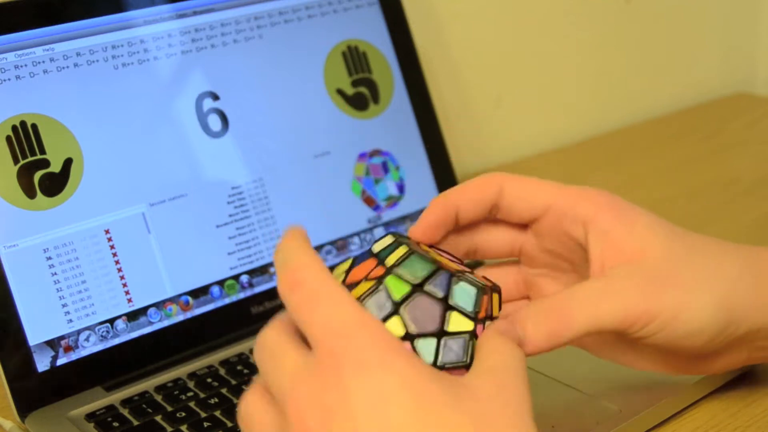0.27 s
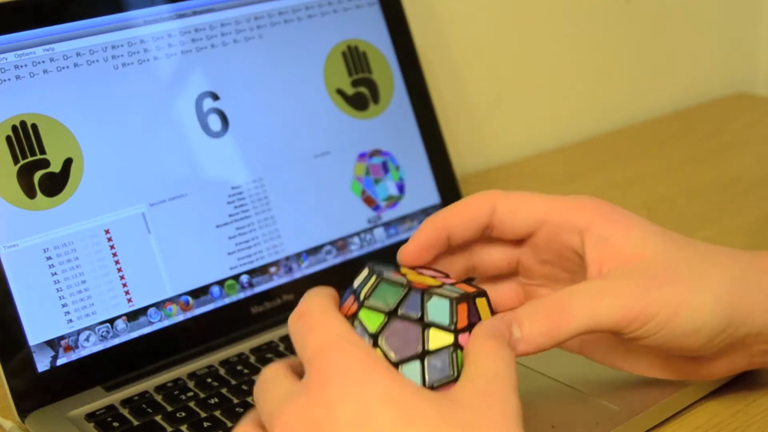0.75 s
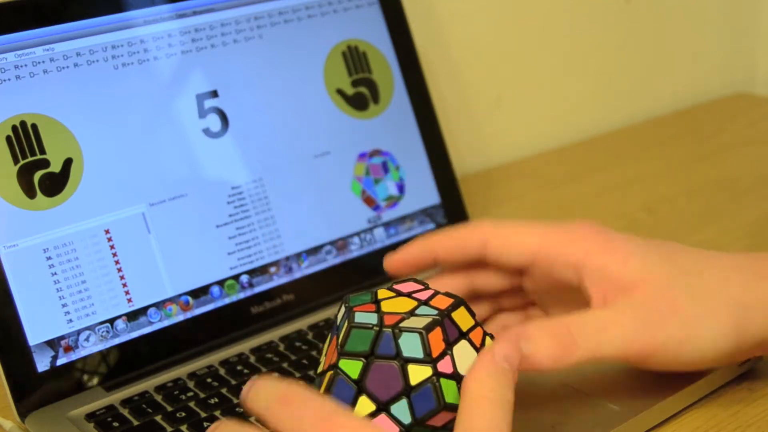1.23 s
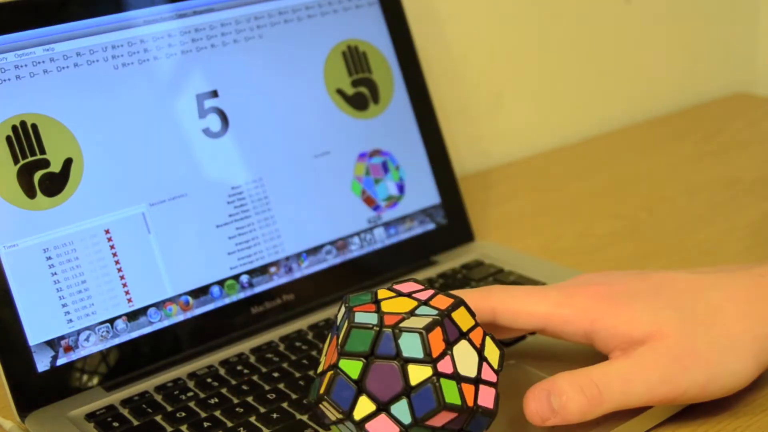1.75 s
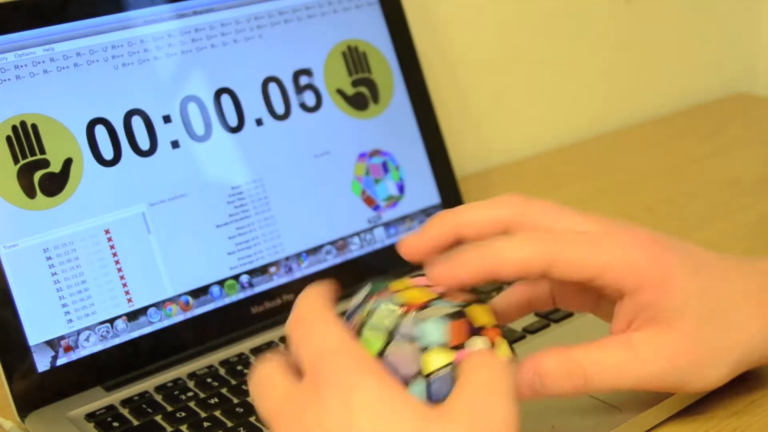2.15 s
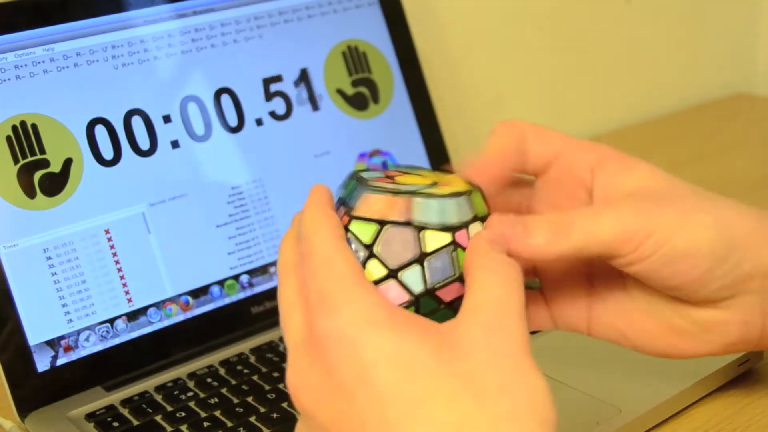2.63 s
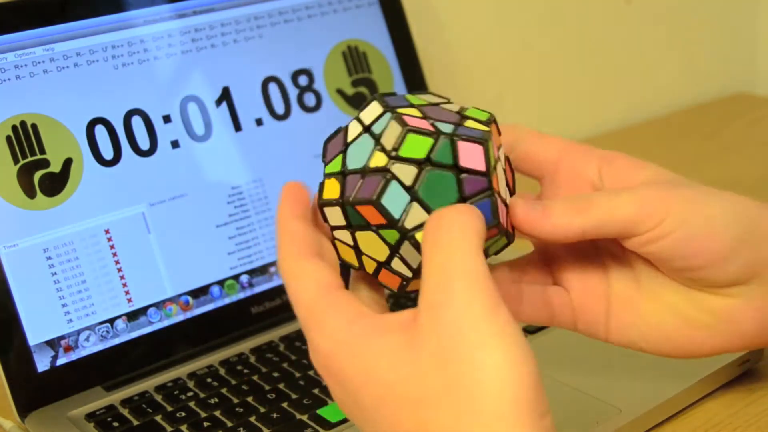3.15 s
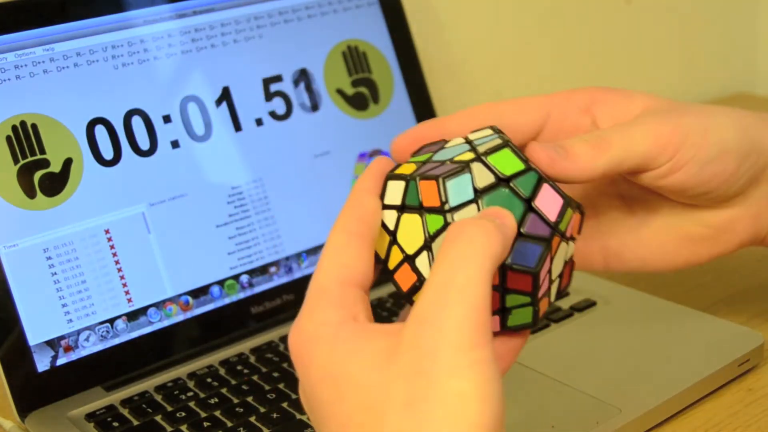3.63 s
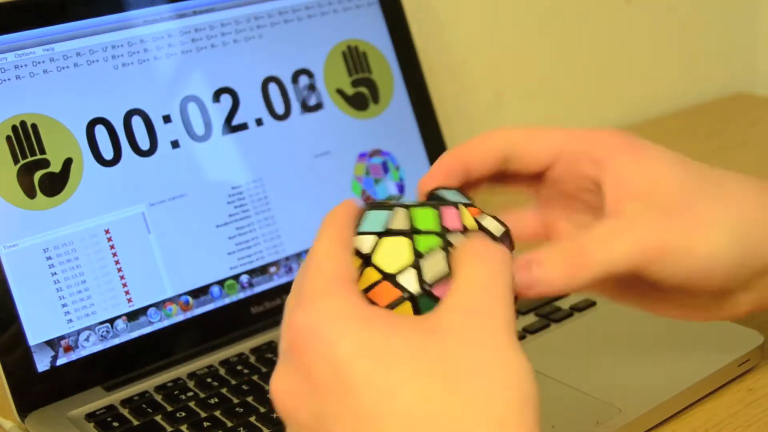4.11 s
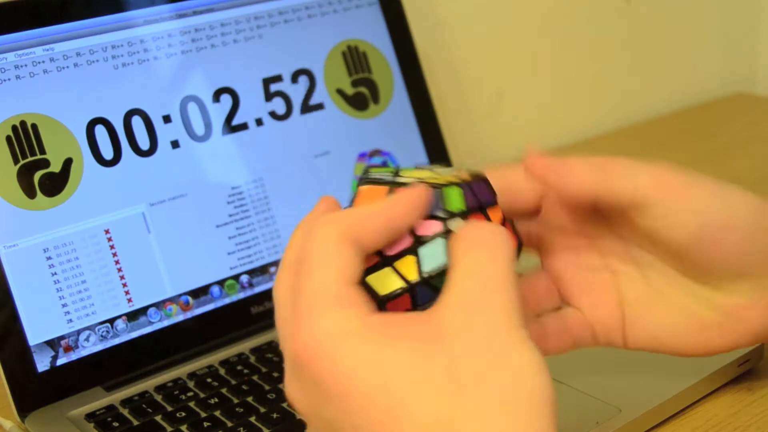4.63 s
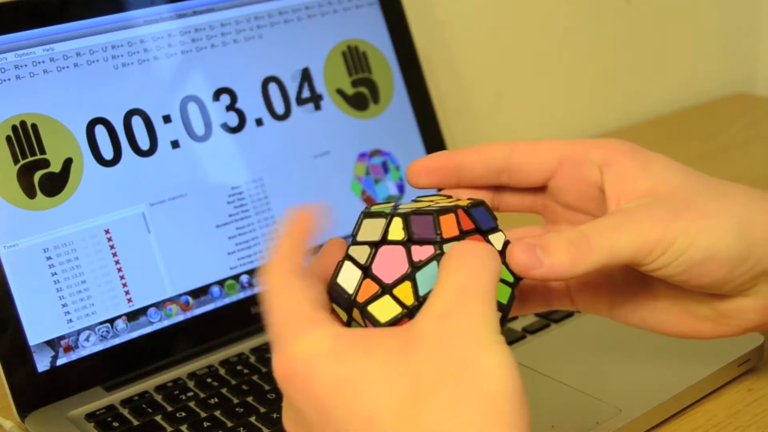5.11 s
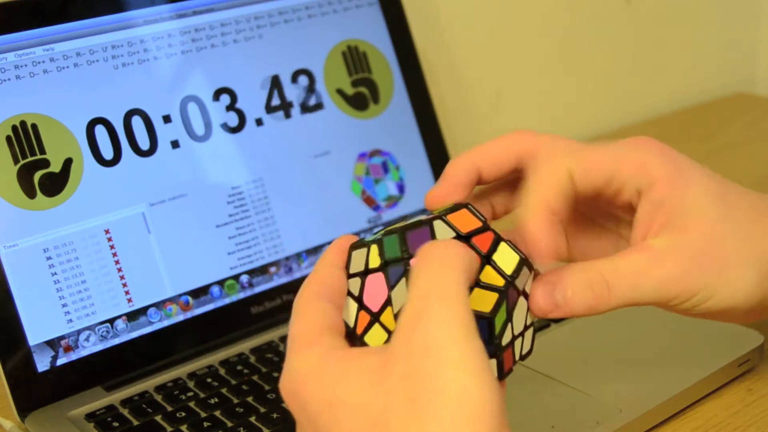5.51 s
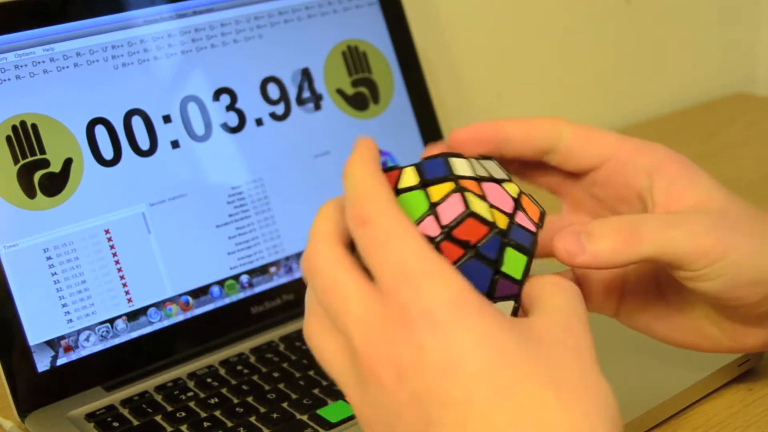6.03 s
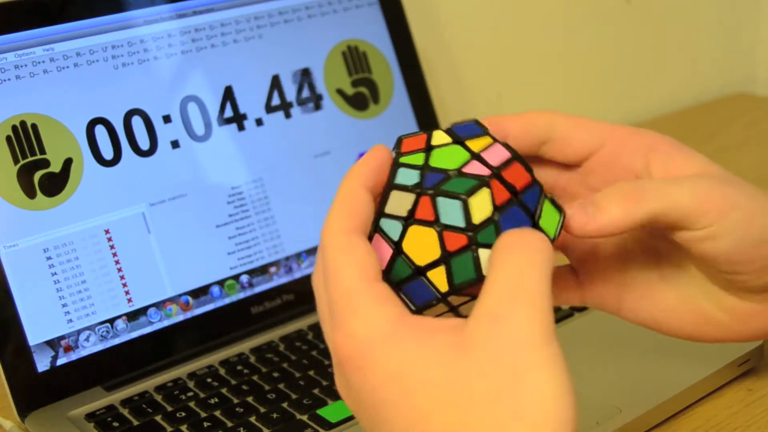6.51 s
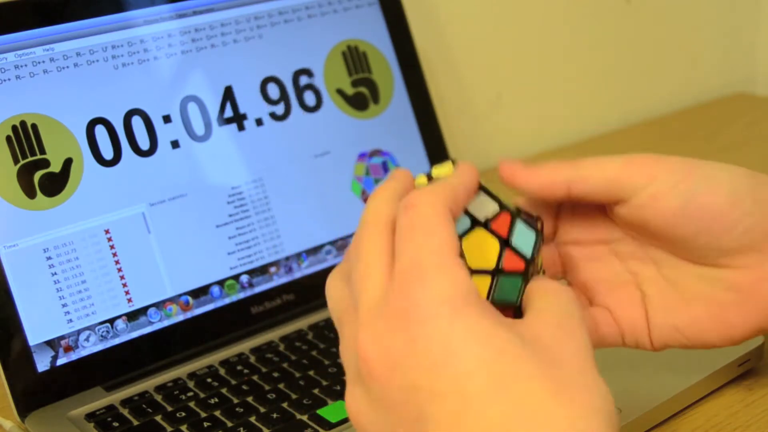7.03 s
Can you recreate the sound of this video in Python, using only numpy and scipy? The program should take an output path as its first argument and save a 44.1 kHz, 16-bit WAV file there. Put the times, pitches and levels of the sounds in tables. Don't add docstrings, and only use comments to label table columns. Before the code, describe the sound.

Close-miked handling indoors: light knocks of plastic on a laptop case, a brief dry skin rub, and a two-part key tap. Quick puzzle turning follows, with sharp clacks, loose ticks, rattles and gritty sliding, densest in the middle, thinning to faint ticks, then returning strongly at the end. Quiet fan noise continues underneath, with a short small-room reverberation.

```python
import sys
import numpy as np
from scipy import signal
from scipy.fft import rfft, irfft
from scipy.io import wavfile
from scipy.ndimage import uniform_filter1d

SR = 44100
rng = np.random.default_rng(int(sys.argv[2]) if len(sys.argv) > 2 else 0)


def convert_level_to_amplitude(level_db):
    exponent = np.asarray(level_db, float) / 20
    return 10 ** exponent


def to_wav(s):
    ch = np.atleast_2d(s).T
    pcm = np.round(np.clip(ch, -1, 1) * 32767)
    wavfile.write(sys.argv[1], SR, pcm.astype(np.int16))


N = 320166

# pitch_hz, level_db (per Hz)
AIR_SPECTRUM = [(25, -25), (50, -12), (100, -5), (200, 0), (400, 0), (630, .5), (1000, -1), (2000, -6),
                (3200, -10.5), (5000, -15), (6300, -19), (8000, -22), (11000, -30)]
AIR_DB = -66.5

# start_s, peak_db, low_db (re peak), bright_db (re peak), desk_thump_db
SET_DOWNS = [(0.4266, -63, 35, -26, -72), (0.716, -59.5, -14, -8, -83), (0.727, -51.5, 4.5, -21, -61.5),
             (0.8398, -35.5, -6, -8, -56), (0.8787, -51.5, -18, -6, -59), (1.0132, -32.5, -11, -22, -54.5),
             (1.0508, -51.5, -20, -33, -64), (1.1837, -57, -1, -10, -70), (1.2151, -59, -1, -8, -85),
             (1.2346, -59, -10, -19, -80), (1.3794, -67, -9, 16, -84), (3.9409, -51.5, 1.5, -11, -88),
             (5.862, -79.5, 2, -20, -62)]
# pitch_hz, width_hz, level_db
CASE_MODES = [(347, 230, -31), (510, 43, -1.5), (790, 430, -3.5), (1180, 1350, -4.5), (1623, 210, 3),
              (1890, 240, -3.5), (2300, 390, -2), (2790, 470, -2), (3110, 520, -2.5), (4800, 2000, -7),
              (6000, 1100, -19), (6100, 450, -21), (10250, 1400, -22)]
# pitch_hz, width_hz, level_db
DESK_MODES = [(105, 24, 0)]
# start_s, peak_db
WRIST_BUMPS = [
    (0.424, -53.5),
    (.735, -50),
    (2.673, -53.5),
    (3.946, -64),
    (5.857, -64),
    (5.903, -64),
]
# pitch_hz, width_hz, level_db
WRIST_MODES = [(171, 92, 1.5), (326, 130, -2), (477, 92, 5.5)]
# start_s, level_db
PALM_DRAG = [
    (1.15, -74),
    (1.176, -83),
    (1.182, -84),
    (1.246, -75),
    (1.252, -68),
    (1.39, -61.5),
    (1.5, -89),
]
# start_s, peak_db, low_db (re peak), bright_db (re peak), desk_thump_db
KEY_BLOWS = [
    (1.942, -53, 7, -11, -76),
    (1.9493, -35.5, -14, -3, -52.5),
    (1.989, -72, -17, 2, -66),
    (2.0224, -42, -11, 0, -51),
    (2.0385, -47, -5.5, -14, -69),
]
# pitch_hz, width_hz, level_db
KEY_MODES = [(414, 400, -2), (720, 730, -2), (1220, 200, 2.5), (1450, 145, 2.5), (1980, 640, -5.5),
             (2560, 260, -6.5), (3300, 890, -10), (5160, 630, -1.5), (5700, 1870, -7.5), (7300, 1400, -5),
             (8560, 1800, -9)]
# pitch_hz, width_hz, level_db
KEY_DESK_MODES = [(170.6, 14, 0)]
SET_DOWN_DYING_MS, KEY_DYING_MS = 8, 7.5
DULL_DAMPING = .2

# pitch_hz, width_hz, level_db
SHELL_MODES = [(505, 120, -3.5), (967, 135, 4.5), (1130, 210, -6.5), (1783, 136, 9), (1946, 1250, 7.5),
               (2343, 1000, 1.5), (4082, 2400, -6.5), (4364, 1630, 9.5), (4676, 1066, 11.5),
               (5030, 2230, 4), (6730, 940, 5.5), (7520, 2300, 1), (9350, 300, -6.5), (9430, 780, -6.5),
               (10200, 3900, -12)]
# start_s, peak_db, hollow_knock_db (re peak)
RATTLES = [(2.1053, -53, 2), (2.1904, -53.5, 2), (2.401, -52.5, -7), (2.5862, -50, 7), (2.5965, -53.5, -10),
           (2.6145, -48, -6), (2.725, -54.5, -8), (2.7533, -55, -3), (3.009, -52, -16.5),
           (3.7293, -50.5, 0), (3.759, -53, 9), (4.029, -50.5, -8), (4.114, -53, -5), (4.383, -52.5, 0.5),
           (4.5152, -55.5, -3), (4.7617, -50, -4), (4.821, -48, -5), (4.8542, -56, -13), (4.896, -54, 11),
           (4.989, -51, -4), (5.0916, -50.5, -27), (5.2402, -55, -8), (5.3018, -54.5, -3),
           (5.3075, -49.5, -9), (5.4022, -50, -2), (5.9327, -52.5, -9), (6.9535, -52, -1), (7.018, -51, 3),
           (7.0533, -53.5, -8), (7.2113, -49, -2)]
# start_s, peak_db, hollow_knock_db (re peak)
LOOSE_TICKS = [(2.1705, -53, 5), (2.274, -55, 0), (2.3536, -57, 5), (2.383, -56, -6), (2.418, -51.5, 5),
               (2.555, -56, -18), (2.771, -53, 10), (2.941, -50, -5.5), (3.289, -57, -16),
               (3.331, -52, -26), (3.345, -56.5, -20.5), (3.6233, -61, 2), (3.858, -54, -9),
               (4.2408, -52, -26), (4.358, -52.5, -3), (4.4257, -55.5, -8), (4.492, -58, -7),
               (4.703, -55.5, -13), (5.263, -56.5, -31), (6.0805, -46, -31), (6.168, -56.5, 0),
               (6.194, -58.5, -20), (6.2527, -56, -6), (6.282, -58, -12), (6.437, -45.5, -29),
               (6.4977, -58, -8.5), (6.6375, -59, -3), (6.7326, -58, -10), (6.7953, -61, -11),
               (7.095, -62, 4)]
# start_s, peak_db, hollow_knock_db
# (re peak), dying_ms
SNAPS = [(2.2018, -37.5, -8.5, 2.8), (2.4375, -39.5, -32, 3.4), (2.4756, -35, -1, 3.2),
         (2.6419, -25.5, -61, 6.4), (2.8696, -38.5, -34, 5.9), (2.9528, -39.5, -23, 2.3),
         (2.98, -49, -25, 5.8), (3.2315, -36.5, -26, 2.4), (3.702, -49, 5.5, 5.4), (3.892, -45.5, -17, 5.3),
         (4.0403, -46.5, 5, 19), (4.1578, -40, 3, 4.2), (4.5028, -48, -22, 3.4), (4.6122, -42.5, -5, 3.5),
         (4.8326, -41.5, -4, 2.9), (4.8791, -41, -34, 4), (4.966, -47.5, -18, 0.89), (4.999, -45.5, -8, 62),
         (5.074, -45.5, -26, 2.2), (5.1762, -32.5, -34, 3.6), (5.4102, -46, -2, 6.8),
         (5.433, -29.5, -10, 12), (5.4919, -39, -30, 2.9), (5.5254, -27.5, -39, 3.1),
         (5.622, -30, -33, 3.1), (5.894, -38.5, -47, 3), (6.3066, -61.5, 4, 2.1), (6.4115, -62.5, -4, 4.4),
         (6.927, -63, -7, 4.3)]
# start_s, peak_db,
# hollow_knock_db (re peak), dying_ms
CLUNKS = [(2.449, -45, -31, 15), (2.4915, -43.5, -7, 2.6), (2.6273, -32.5, -62, 12),
          (2.8072, -42, -13, 3.7), (2.8273, -46, 2, 7.6), (2.841, -34.5, 5.5, 4.3), (2.8546, -37, -26, 3.3),
          (2.904, -45.5, -14, 7.9), (3.3052, -45.5, -11, 2.7), (3.783, -31.5, -6, 5.3),
          (4.063, -36.5, -4, 4.4), (4.082, -40, -2, 4.4), (4.1338, -41.5, 5.5, 11.5),
          (4.5514, -46.5, -6, 6.3), (4.575, -31.5, -5, 2), (4.7499, -49, -13, 12), (4.8027, -45, -6, 5.1),
          (5.0172, -28.5, 2, 5.9), (5.3218, -47, 1, 4.9), (5.3492, -39, 2.5, 4.1), (5.457, -47, -37, 3.7),
          (5.4658, -46.5, -5, 13), (5.5584, -51, -25, 5.1), (5.6509, -43.5, 1, 23), (5.6659, -34, 3, 6.2),
          (5.7495, -44, -42, 4.7), (6.9695, -41.5, -10, 8.1), (6.987, -40, -4, 4.7),
          (7.242, -32.5, -11, 7.3), (7.2579, -29, 2.5, 3)]
SNAP_TICK_DB, SNAP_GATHER_MS = -6, 1
CLUNK_TICK_DB, CLUNK_GATHER_MS = -6, 3.38
RATTLE_TICK_DB, RATTLE_GATHER_MS, RATTLE_DYING_MS = -13, 3.7, 9.5
LOOSE_TICK_DB, LOOSE_GATHER_MS, LOOSE_DYING_MS = -22.5, .9, 4.9
# fastest_s, level_db, speed_up_s, stop_s
TURNS = [(2.12, -76, .1, .3), (2.509, -52, 0.4, 0.079), (2.65, -48, 0.059, 0.19),
         (2.86, -50.5, 0.21, 0.085), (3.31, -59, 0.092, 0.081), (3.75, -49.5, 0.036, 0.27),
         (4.1, -56, 0.074, 0.45), (4.37, -68, 0.3, 0.099), (4.57, -57.5, .12, 0.12),
         (4.82, -48, 0.17, 0.21), (5.03, -50, 0.15, 0.046), (5.33, -49, 0.027, 0.18),
         (5.45, -49, 0.16, 0.13), (5.72, -49.5, 0.2, 0.064), (6.3, -74, 0.18, 0.43),
         (5.91, -69, .02, 0.076), (6.98, -40.5, 0.051, 0.12), (7.26, -38, 0.034, .1)]
TURN_RANGE_DB = 20
# pitch_hz, level_db
SCRAPE_TONE = [(900, 2.5), (2500, -0.5), (5000, 1), (10000, -6.5)]
GRIT_DB = -2

# pitch_hz, t60_s
ROOM_T60 = [(300, 0.19), (1500, 0.27), (5000, 0.22), (10000, 0.17)]
ROOM_DB, ROOM_GAP_S = -9.5, 0.0015
# pitch_hz, level_db
MIC_TONE = [(7300, 1.5), (8000, -4), (8700, 4.5), (10300, 3), (11300, -12)]
TOP_HZ = 11200


def level(x, db):
    return x * convert_level_to_amplitude(db) / np.sqrt(np.mean(x ** 2))


def colour(x, points):
    hz, db = np.transpose(points)
    f = np.maximum(np.arange(len(x) // 2 + 1) * SR / len(x), 1)
    return irfft(rfft(x) * convert_level_to_amplitude(np.interp(np.log(f), np.log(hz), db)), len(x))


def highpass(x, hz):
    return signal.sosfilt(signal.butter(3, hz, "high", fs=SR, output="sos"), x)


def ring(modes, gain_db, detune, size):
    hz, width, db = np.transpose(modes)[:, :, None]
    t = np.arange(size) / SR
    sign = (-1.) ** np.arange(len(modes))[:, None]
    decay = np.exp(-np.pi * width * t)
    tone = np.sin(2 * np.pi * hz * detune * t)
    return np.sum(sign * width * convert_level_to_amplitude(db + gain_db) * decay * tone, axis=0)


def knocks(rows, modes, low_hz, high_hz, scatter_db, spread, knock_hz, lead=512, size=2560):
    out = np.zeros(N + 2 * size)
    ms = 1000 * (np.arange(size) - lead) / SR
    hz = np.array(modes)[:, :1]
    low = 1 / (1 + (hz / low_hz) ** 4)
    high = 1 / (1 + (high_hz / hz) ** 4)
    for s, db, low_db, high_db, gather_ms, dying_ms in rows:
        uneven, detune = rng.standard_normal((2, len(modes), 1))
        gain_db = low_db * low + high_db * high + scatter_db * uneven
        body = ring(modes, gain_db, 1 + spread * detune, size=1024)
        gather = -(ms / max(1.3 * gather_ms, .1)) ** 2
        force = np.exp(np.where(ms < 0, gather, -ms / max(dying_ms, .5)))
        push = (rng.random(size) < knock_hz / SR) * rng.standard_normal(size)
        push[lead] = 1.9
        spectrum = rfft(push * force)
        push = irfft(spectrum / np.sqrt(uniform_filter1d(np.abs(spectrum) ** 2, size=24)), size)
        blow = signal.fftconvolve(body, push)
        peak = np.sqrt(uniform_filter1d(blow ** 2, size=128).max())
        i = int(s * SR) - lead
        out[i:i + len(blow)] += blow * convert_level_to_amplitude(db) / peak
    return out[:N]


def thump(s, db, modes, swell_s):
    blows = np.zeros(N)
    blows[(s * SR).astype(int)] = convert_level_to_amplitude(db)
    swell = (1 - np.exp(-np.arange(8192) / SR / swell_s)) ** 2
    boom = swell * ring(modes, 0, 1, size=8192)
    return signal.fftconvolve(blows, boom / np.abs(boom).max())[:N]


def struck(rows, modes, desk, dying_ms, swell_s):
    sharp = [(s, db, low + 6, high + 6, .5, dying_ms * convert_level_to_amplitude(DULL_DAMPING * high))
             for s, db, low, high, _ in rows]
    part = knocks(sharp, modes, low_hz=1000, high_hz=3500, scatter_db=1.5, spread=.015, knock_hz=4000)
    rows = np.array(rows)
    boom = thump(rows[:, 0], rows[:, -1], desk, swell_s)
    return highpass(part, 330) + convert_level_to_amplitude(-6.5) * boom


def crackle(modes, grain_hz, scatter_db):
    grains = (rng.random(N) < grain_hz / SR) * rng.standard_normal(N)
    ticks = grains * convert_level_to_amplitude(scatter_db * rng.exponential(size=N))
    return level(signal.fftconvolve(ticks, ring(modes, 0, 0.93, size=4096))[:N], 0)


def fan_and_air():
    return level(colour(rng.standard_normal(N), AIR_SPECTRUM), AIR_DB)


def wrist_bumps():
    return thump(*np.transpose(WRIST_BUMPS), WRIST_MODES, swell_s=0.0015)


def set_downs():
    return struck(SET_DOWNS, CASE_MODES, DESK_MODES, SET_DOWN_DYING_MS, swell_s=0.0064)


def palm_drag():
    s, db = np.transpose(PALM_DRAG)
    gain = convert_level_to_amplitude(np.interp(np.arange(N) / SR, s, db, left=-150, right=-150))
    return convert_level_to_amplitude(-3.5) * gain * crackle(CASE_MODES, grain_hz=4030, scatter_db=-1.0)


def key_tap():
    return struck(KEY_BLOWS, KEY_MODES, KEY_DESK_MODES, KEY_DYING_MS, swell_s=0.019)


def puzzle_clacks():
    rows = [(*r, RATTLE_TICK_DB, RATTLE_GATHER_MS, RATTLE_DYING_MS) for r in RATTLES]
    rows += [(*r, LOOSE_TICK_DB, LOOSE_GATHER_MS, LOOSE_DYING_MS) for r in LOOSE_TICKS]
    rows += [(s, db, low, SNAP_TICK_DB, SNAP_GATHER_MS, ms) for s, db, low, ms in SNAPS]
    rows += [(s, db, low, CLUNK_TICK_DB, CLUNK_GATHER_MS, ms) for s, db, low, ms in CLUNKS]
    rows = np.array(rows) + [0, 0, 8, 6, 0, 0]
    return knocks(rows, SHELL_MODES, low_hz=1700, high_hz=6000, scatter_db=2, spread=.025, knock_hz=5000)


def turning():
    t = np.arange(N) / SR
    gain = np.zeros(N)
    for s, db, up, down in TURNS:
        away = np.maximum((s - t) / max(up, .01), (t - s) / max(down, .01))
        gain += convert_level_to_amplitude(db - TURN_RANGE_DB * away)
    return gain


def sliding_faces():
    slide = crackle(SHELL_MODES, grain_hz=4000, scatter_db=1.8)
    grit = crackle(SHELL_MODES, grain_hz=300, scatter_db=3.5)
    return convert_level_to_amplitude(-12.5) * turning() * colour(slide + convert_level_to_amplitude(GRIT_DB) * grit, SCRAPE_TONE)


def room(x):
    t, tail = np.arange(SR // 2) / SR, 0
    hz, t60 = np.transpose(ROOM_T60)
    for f in 125 * 2. ** np.arange(7):
        octave = signal.butter(2, [f / 2 ** .5, f * 2 ** .5], "band", fs=SR, output="sos")
        fall = np.exp(-np.log(1000) * t / np.interp(np.log(f), np.log(hz), t60))
        tail = tail + fall * signal.sosfilt(octave, rng.standard_normal(len(t)))
    tail = tail * np.clip(t / ROOM_GAP_S - 1, 0, 1)
    return signal.fftconvolve(x, convert_level_to_amplitude(ROOM_DB) * tail / np.sqrt(np.sum(tail ** 2)))[:N]


def scene():
    laptop = wrist_bumps() + set_downs() + palm_drag() + key_tap()
    puzzle = highpass(puzzle_clacks() + sliding_faces(), 760)
    near = laptop + puzzle
    return (fan_and_air() + near + room(near))[None]


def band_limit(x):
    return signal.sosfilt(signal.butter(12, 11330, fs=SR, output="sos"), x)


def record(dry):
    heard = colour(np.pad(dry[0], (0, 4096)), MIC_TONE)[None, :N]
    top_cut = signal.ellip(8, .3, 45, TOP_HZ, fs=SR, output="sos")
    return band_limit(signal.sosfilt(top_cut, heard))


dry = scene()
out = record(dry)
to_wav(out)
```